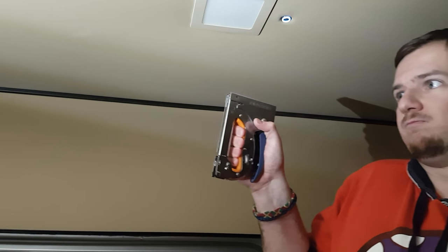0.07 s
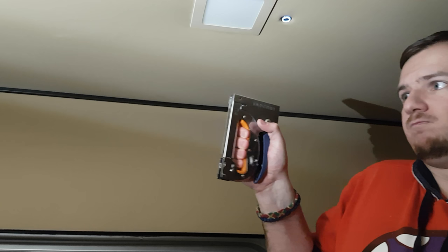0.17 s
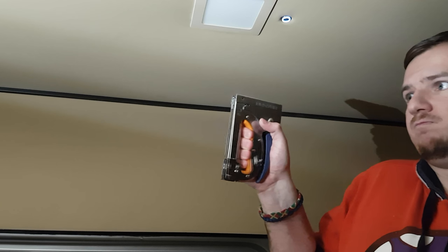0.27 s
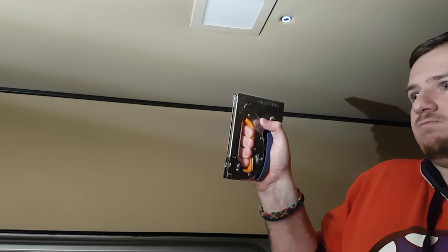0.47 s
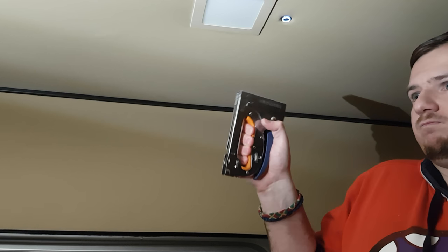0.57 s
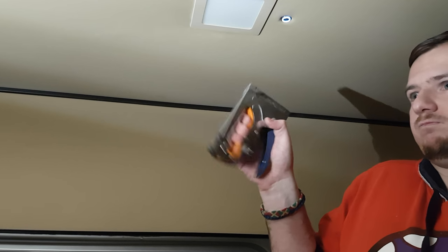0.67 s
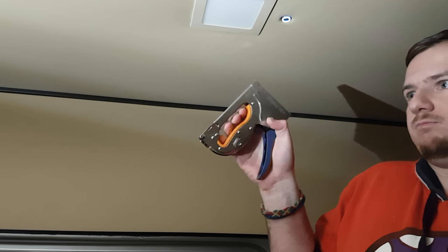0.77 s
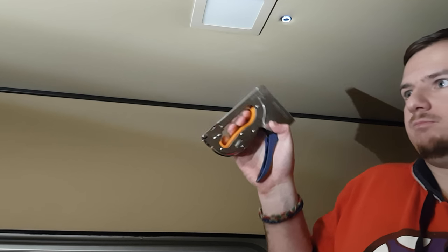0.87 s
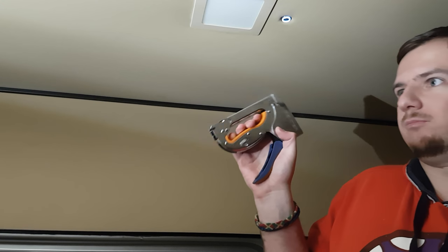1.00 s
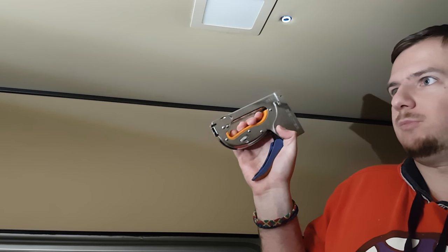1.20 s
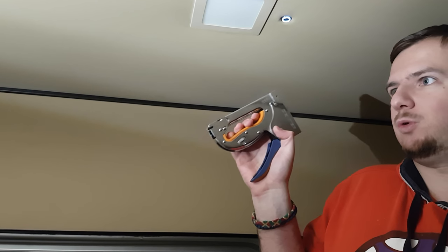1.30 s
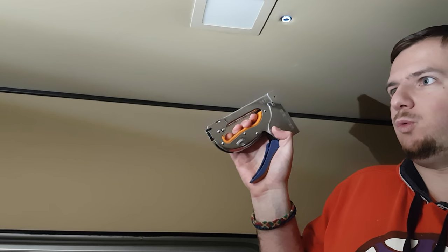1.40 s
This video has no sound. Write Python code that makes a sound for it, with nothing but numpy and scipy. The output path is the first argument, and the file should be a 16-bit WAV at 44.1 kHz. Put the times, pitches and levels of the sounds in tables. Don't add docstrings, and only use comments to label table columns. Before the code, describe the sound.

A hand staple gun clicks, then fires one loud metallic snap inside a van, lever clicking back

```python
import sys
import numpy as np
from scipy import signal
from scipy.fft import rfft, irfft, next_fast_len
from scipy.io import wavfile
from scipy.ndimage import uniform_filter1d

SR = 44100
rng = np.random.default_rng(int(sys.argv[2]) if len(sys.argv) > 2 else 0)


def transcribe(signal):
    frames = np.atleast_2d(signal).T
    limited = np.clip(frames, -1, 1)
    pcm = np.round(limited * 32767).astype(np.int16)
    wavfile.write(sys.argv[1], SR, pcm)


def to_linear_factor(level_db):
    exponent = np.asarray(level_db, float) / 20
    return 10 ** exponent


N = 63945
T = np.arange(N) / SR
M = next_fast_len(N)
HZ = np.maximum(np.fft.rfftfreq(M, 1 / SR), 1)


def unit(x):
    return x / np.sqrt(np.mean(x ** 2))


def on_log(table, hz):
    table_hz, value = np.transpose(np.array(table, float))
    return np.interp(np.log(hz), np.log(table_hz), value)


def coloured(table, tilt_db_per_octave=0):
    tilt_db = tilt_db_per_octave * np.log2(np.maximum(HZ, 3500) / 3500)
    spectrum = rfft(rng.standard_normal(M)) * to_linear_factor(on_log(table, HZ) + tilt_db)
    return unit(irfft(spectrum, M)[:N])


def since(at_s):
    return np.clip(T - at_s, 0, None)


def walk(rate_hz):
    hold = int(SR / rate_hz)
    steps = np.repeat(rng.standard_normal(N // hold + 1), hold)
    return 0.66 * uniform_filter1d(uniform_filter1d(steps, hold), hold)[:N]


def burst(at_s, rise_ms, length_ms):
    ms = since(at_s) * 1000
    return (1 - np.exp(-ms / rise_ms)) ** 2 * np.exp(-ms / length_ms) * 2


MODE_SWAY = .6


def ring(at_s, modes, width_hz):
    u, out = since(at_s), 0
    for hz, db, t60_s in modes:
        sway = unit(walk(2 * width_hz)) + 1j * unit(walk(2 * width_hz))
        wave = np.real((1.3 + MODE_SWAY * sway) * np.exp(2j * np.pi * hz * u))
        out = out + to_linear_factor(db - 60 * u / t60_s) * wave
    return out * (1 - np.exp(-u * 1000 / 2))


# hz, t60_s
VAN_T60_S = [(400, 0.18), (1000, .2), (2500, 0.17), (6000, .17), (15000, .15)]
# hz, t60_s
VAN_LATE_T60_S = [(1000, .5), (3000, .5), (12000, .35)]
VAN_LATE_DB = -38


def van(at_s, noise, build_ms):
    u, out, spectrum = since(at_s), 0, rfft(noise, M)
    for hz in 250 * 2 ** np.arange(7):
        band = irfft(spectrum * np.clip(1 - np.abs(np.log2(HZ / hz)), 0, 1), M)[:N]
        early = to_linear_factor(-60 * u / on_log(VAN_T60_S, hz))
        late = to_linear_factor(VAN_LATE_DB - 60 * u / on_log(VAN_LATE_T60_S, hz))
        out = out + band * (early + late)
    return out * (1 - np.exp(-u * 1000 / build_ms))


# hz, level_db_per_hz
RUMBLE_COLOUR = [(18, -32.5), (30, -6), (134, -3), (526, -22), (1040, -28.5), (1250, -32.5), (2290, -37),
                 (6720, -52), (16000, -53.5)]
# start_s, level_db, tilt_db_per_octave
RUMBLE_LEVEL = [(0, -50, 1), (.3, -48.5, -0.5), (.43, -47, -2), (.5, -52.5, -9), (.6, -65.5, 4),
                (.72, -64.5, 0.5), (1.0, -68, 1), (1.25, -66.5, 2.5), (1.45, -61.5, 1.5)]
# pitch_hz, level_db, wander_share
HUM = [(135, -58, .02), (387, -62, .005)]
FLICKER_DB, FLICKER_RATE_HZ = 3.5, 21
WHINE_HZ, WHINE_DB, WHINE_START_S, WHINE_END_S = 1345, -76, 1.08, 1.165


def rumble():
    start_s, level_db, tilt_db = np.transpose(RUMBLE_LEVEL)
    db, tilt = np.interp(T, start_s, level_db), np.interp(T, start_s, tilt_db)
    noise, out = rfft(coloured(RUMBLE_COLOUR)), 0
    octave = np.log2(np.maximum(np.fft.rfftfreq(N, 1 / SR), 1) / 150)
    for centre in np.arange(-3, 7.5, .5):
        band = irfft(noise * np.clip(1 - 2 * np.abs(octave - centre), 0, 1), N)
        out = out + band * to_linear_factor(db + tilt * max(centre, 0) + FLICKER_DB * walk(FLICKER_RATE_HZ))
    for hz, hum_db, wander in HUM:
        level = to_linear_factor(hum_db + db + 48 + 2 * unit(walk(20)))
        turns = np.cumsum(hz * (1 + wander * unit(walk(20)))) / SR
        out = out + level * np.sin(2 * np.pi * turns)
    on = uniform_filter1d(1. * ((T > WHINE_START_S) & (T < WHINE_END_S)), size=600)
    return out + on * to_linear_factor(WHINE_DB + 2 * walk(24.2)) * np.sin(2 * np.pi * WHINE_HZ * T)


# start_s, level_db, crack_ms, tilt_db_per_octave, room_db
TICKS = [(.2245, -14, 2.5, 0, -12), (.3712, -46, 4, -11, -4), (.680, -61, 3, -5, -6),
         (.802, -68, 8, -16, -1), (.8198, -42, 2, -3, -13), (.8312, -44, 4, -1, -7), (.848, -55, 3, -4, -8),
         (.8865, -61, 3, -12, 0), (.9088, -20, 1.8, 0, -15.5), (1.067, -62, 2, -9, -7),
         (1.1675, -56, 5, -14, -2)]
# hz, level_db_per_hz
LATCH_COLOUR = [(500, -28), (900, -17.5), (1550, 6), (2300, -7), (3500, 2.5), (4800, -7.5), (8900, -2),
                (16000, -11)]
LATCH_TAIL_COLOUR = [(500, -49), (900, -24.5), (1500, -4), (3700, -7), (4800, -17), (6500, -14),
                     (8900, -10), (16000, -17.5)]
LEVER_COLOUR = [(500, -42), (1050, 2), (1600, 0.5), (2000, -7), (3400, -4.5), (6500, -11.5), (9000, -5),
                (16000, -9)]
LEVER_TAIL_COLOUR = [(400, -21.5), (800, -15.5), (1200, -1), (3200, -3), (6500, -10), (9000, -4.5),
                     (12000, -8), (16000, -11.5)]
# pitch_hz, level_db, t60_s
LATCH_MODES = [(1580, -1, .14), (1880, -4, .15), (3070, -6, .2), (3451, -2, .13), (7348, 4, .15),
               (8550, -3, .15), (8870, -1, .15), (9250, -3, .15), (11790, -2, .13), (12310, -5, .14)]
LATCH_RING_DB, LATCH_WIDTH_HZ = -37, 70
TICK_RISE_MS, TICK_BUILD_MS, TICK_THUD_DB, TICK_THUD_HZ = 0.47, 2.4, -17.5, 291


def ticks():
    out, thud = to_linear_factor(LATCH_RING_DB) * ring(TICKS[0][0], LATCH_MODES, LATCH_WIDTH_HZ), 0
    for k, (start_s, db, crack_ms, tilt_db, room_db) in enumerate(TICKS):
        near, far = (LEVER_COLOUR, LEVER_TAIL_COLOUR) if k else (LATCH_COLOUR, LATCH_TAIL_COLOUR)
        env = to_linear_factor(db) * burst(start_s, TICK_RISE_MS, crack_ms)
        walls = to_linear_factor(db + room_db) * van(start_s, coloured(far, tilt_db), TICK_BUILD_MS)
        out = out + env * coloured(near, tilt_db) + walls
        thud = thud + env * np.cos(2 * np.pi * TICK_THUD_HZ * (T - start_s))
    low = signal.butter(2, TICK_THUD_HZ, fs=SR, output="sos")
    return out + to_linear_factor(TICK_THUD_DB) * signal.sosfilt(low, thud)


# start_s, level_db, length_ms
SHOT = [
    (.4390, -5.5, 3.6),
    (0.4405, -6.5, 2.1),
    (.445, -12, 3.6),
    (0.454, -12.5, 6),
    (0.4625, -16, 5.3),
    (0.471, -18.5, 7),
    (.4845, -22.5, 5),
]
# hz, level_db_per_hz
SHOT_COLOUR = [(290, -48), (500, -11.5), (1020, -0.5), (2810, 0.5), (5240, -8.5), (8090, -7.5), (8700, -12),
               (12700, -5.5), (16000, -3)]
SHOT_TAIL_COLOUR = [(300, -31), (950, -29), (1240, -14), (2000, -13.5), (2800, -8.5), (4500, -13.5),
                    (11600, -5), (16000, -12)]
# pitch_hz, level_db, t60_s
BODY_MODES = [(950, -5, .04), (1276, -6, .15), (2300, -8, .14), (2533, 2, .19), (2660, -2, .24),
              (2860, 2, .19), (3019, -1, .2), (3140, -4, .2), (3272, -5, .22), (5782, -8, .12),
              (9163, 3, .12), (11850, -6, .14), (12800, -6, .14)]
BODY_RING_DB, BODY_WIDTH_HZ = -25, 70
SHOT_RISE_MS, SHOT_ROOM_DB, SHOT_BUILD_MS = 0.96, -6, 6.5


def shot():
    env, walls = 0, 0
    for start_s, db, length_ms in SHOT:
        env = env + to_linear_factor(db) * burst(start_s, SHOT_RISE_MS, length_ms)
        walls = walls + to_linear_factor(db + SHOT_ROOM_DB) * van(start_s, coloured(SHOT_TAIL_COLOUR), SHOT_BUILD_MS)
    body = to_linear_factor(BODY_RING_DB) * ring(SHOT[1][0], BODY_MODES, BODY_WIDTH_HZ)
    return env * coloured(SHOT_COLOUR) + walls + body


# pitch_hz, level_db, t60_s
THUMP_OVERTONES = [(330, -7, .05), (410, -6.5, .03), (480.2, -2.5, .05), (598, -1, 0.039),
                   (774, -13, 0.043)]
THUMP_S, THUMP_HZ, THUMP_SAG_HZ_PER_S2, THUMP_PHASE_RAD = .4446, 222, 420000, .7
THUMP_RISE_MS, THUMP_HOLD_MS, THUMP_FALL_MS = .6, 19, 4
THUMP_DB, THUMP_FADE_DB_PER_S = -3, -350
BOOM_HZ, BOOM_DB, BOOM_T60_S = 65.6, -13, 0.74


def thump():
    u = since(THUMP_S)
    rise = np.clip(u * 1000 / THUMP_RISE_MS, 0, 1)
    fall = np.clip(1 - (u * 1000 - THUMP_HOLD_MS) / THUMP_FALL_MS, 0, 1)
    turns = THUMP_HZ * u - THUMP_SAG_HZ_PER_S2 * u ** 3 / 3
    wave = to_linear_factor(THUMP_FADE_DB_PER_S * u) * np.sin(2 * np.pi * turns + THUMP_PHASE_RAD)
    for hz, db, t60_s in THUMP_OVERTONES:
        wave = wave + to_linear_factor(db - 60 * u / t60_s) * np.sin(2 * np.pi * hz * u)
    boom = to_linear_factor(BOOM_DB - 60 * u / BOOM_T60_S) * np.sin(2 * np.pi * BOOM_HZ * u)
    return rise * fall * (to_linear_factor(THUMP_DB) * wave - boom)


# hz, level_db_per_hz
STAPLE_COLOUR = [(180, -39), (300, -8.5), (1320, -4), (1970, -6), (3130, -1.5), (5800, -14), (8940, -7),
                 (16000, -11)]
STAPLE_S, STAPLE_DB, STAPLE_RISE_MS, STAPLE_MS = .6102, -49.5, 0.72, 4
STAPLE_ROOM_DB, STAPLE_BUILD_MS = -38, 2.7


def staple():
    tick = to_linear_factor(STAPLE_DB) * burst(STAPLE_S, STAPLE_RISE_MS, STAPLE_MS) * coloured(STAPLE_COLOUR)
    return tick + to_linear_factor(STAPLE_ROOM_DB) * van(STAPLE_S, coloured(STAPLE_COLOUR), STAPLE_BUILD_MS)


def scene():
    return (rumble() + ticks() + shot() + thump() + staple())[None, :]


def top_cut(x):
    return signal.sosfilt(signal.butter(12, 16470, fs=SR, output="sos"), x)


TOP_HZ, CLIP_KNEE = 15700, .75


def record(dry):
    dry = signal.sosfilt(signal.ellip(8, .2, 60, TOP_HZ, fs=SR, output="sos"), dry)
    size, room = np.abs(dry), 1 - CLIP_KNEE
    over = np.clip(size - CLIP_KNEE, 0, None)
    soft = np.sign(dry) * (np.minimum(size, CLIP_KNEE) + room * np.tanh(over / room))
    return top_cut(soft)


dry = scene()
out = record(dry)
transcribe(out)
```